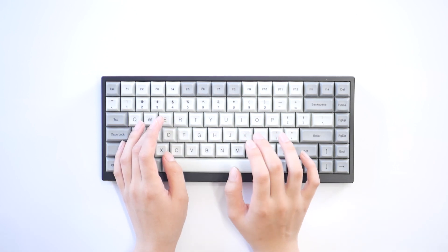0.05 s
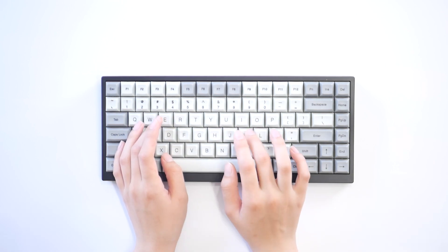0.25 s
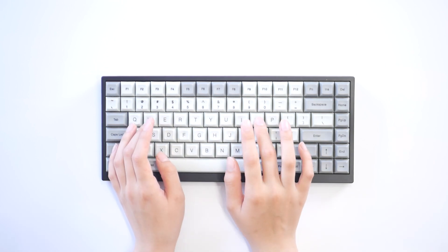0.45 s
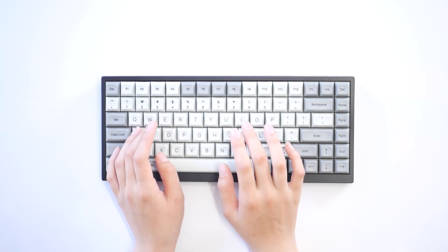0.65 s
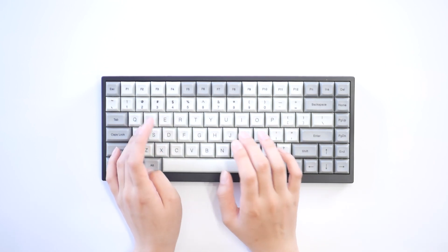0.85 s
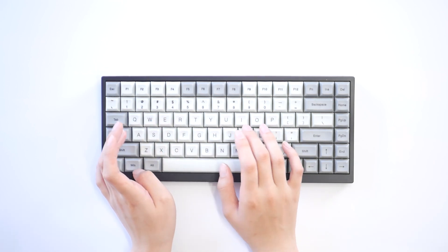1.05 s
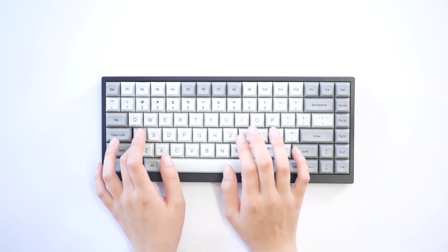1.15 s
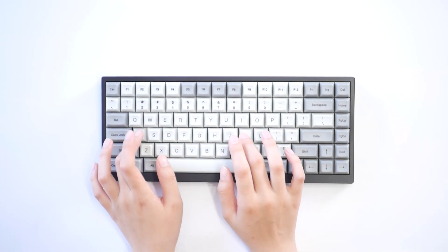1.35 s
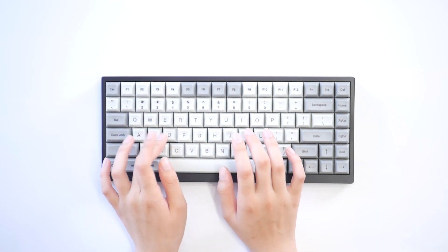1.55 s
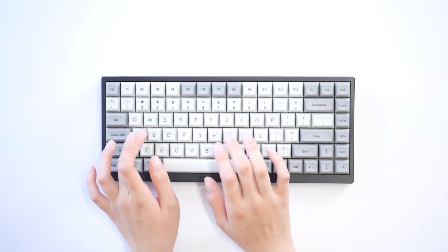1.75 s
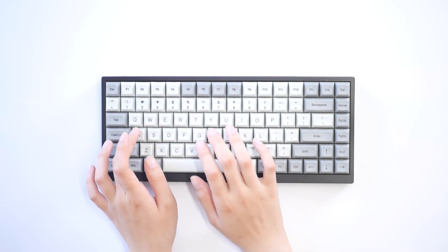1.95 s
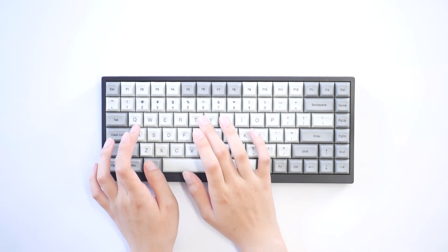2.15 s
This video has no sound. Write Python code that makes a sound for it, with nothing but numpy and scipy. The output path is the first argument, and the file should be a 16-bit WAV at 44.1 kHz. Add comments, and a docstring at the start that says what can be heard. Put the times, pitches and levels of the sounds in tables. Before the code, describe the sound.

Mechanical keyboard typing, crisp light clacks in two quick runs, in a small quiet room

```python
"""A key struck just before the start is dying away; then fingers type on a mechanical keyboard on a desk.
Some stems scrape (filtered noise) before landing; each hit is a clack plus the decaying modes of cap, switch,
plate, case and desk, a crack, a metal ping and a snap; one spring rings on after an early hit.
Dull echoes and a diffuse tail follow each sound in a small quiet room; shaped noise makes a steady low
hum and hiss throughout. Stereo."""
import sys
import numpy as np
from scipy import signal
from scipy.fft import rfft, irfft
from scipy.io import wavfile

SR = 44100
rng = np.random.default_rng(int(sys.argv[2]) if len(sys.argv) > 2 else 0)


def waveform_to_disk(signal):
    """Save audio, clipped to [-1, 1], as 16-bit WAV at the path in sys.argv[1]."""
    frames = np.transpose(np.atleast_2d(signal))
    scaled = np.clip(frames, -1, 1) * 32767
    samples = np.round(scaled).astype(np.int16)
    wavfile.write(sys.argv[1], SR, samples)


N = 97020
LEAD = SR // 5  # samples kept before the start; also the length of every ring


def undb(db):
    """Amplitude factor of a level in dB."""
    return 10 ** (np.asarray(db, float) / 20)


def read(table, hz):
    """Value of a (hz, value) table, interpolated on a log frequency axis."""
    points = np.array(table, float)
    return np.interp(np.log(np.maximum(hz, 1)), np.log(points[:, 0]), points[:, 1])


# Modes of each part: nominal pitch_hz [Hz], relative level_db [dB], t60_s [s]
DESK_MODES = [(60.3, -8.5, 0.071), (84, 0.5, 0.063), (104.6, -6.5, .12), (160.6, -2.7, 0.3)]
CASE_MODES = [(250.4, -2.6, 0.14), (308.5, -4.5, 0.12), (398, -9, 0.12), (523, -7, 0.053)]
PLATE_MODES = [(751, 0.5, 0.029), (958, -6, 0.069), (1119, 5.2, 0.03), (1371, 6.6, 0.032)]
CAP_MODES = [(1560, -3.3, 0.011), (1725, 0.26, 0.046), (2203, 1, 0.045)]
SWITCH_MODES = [(3580, 0.1, 0.021), (3980, 0.1, 0.028)]
CRACK_MODES = [(4610, 8.3, 0.0013), (5700, -2.5, 0.0028), (6840, -3.5, 0.0034), (8460, -7.5, 0.0039)]
PING_MODES = [(9344, 0.1, 0.0057), (10040, -4.5, 0.003)]
SNAP_MODES = [(11180, 0.1, 0.006), (12670, -1, 0.006), (13930, -0.84, 0.0062), (14600, -2, .005)]
PART_MODES = (DESK_MODES, CASE_MODES, PLATE_MODES, CAP_MODES,
              SWITCH_MODES, CRACK_MODES, PING_MODES, SNAP_MODES)
# Per part, in the same order: level added to each hit's part level [dB]
PART_TRIM_DB = (3.5, -4.5, -2.5, -3, -12.5, 1, 2, 12)
# Per part: delay after the clack [s]
PART_LAG_S = (0.0025, 0.0019, 0.001462, 0.00061, .0005, 0.00026, .0005, .0002)
# Per part: onset time constant [s]
PART_RISE_S = (0.002, 0.0012, 0.00066, 0.0015, 0.0008, 0.00019, 0.00015, 0.000053)
CLACK_T60_S, CLACK_RISE_S = .0024, .0005
OVERTONE_RATIO, OVERTONE_DB = 1.283, -1  # clack partials above and below its pitch


def key_strike(pitch_hz, part_levels_db, detune):
    """Impact modes: a three-partial clack of peak 1, and the same clack with all parts ringing after it."""
    partials = [(pitch_hz / OVERTONE_RATIO, OVERTONE_DB, CLACK_T60_S),
                (pitch_hz, 0, CLACK_T60_S),
                (pitch_hz * OVERTONE_RATIO, OVERTONE_DB, CLACK_T60_S)]
    clack = ring(partials, detune, CLACK_RISE_S)
    strike = clack.copy()
    parts = zip(PART_MODES, part_levels_db, PART_TRIM_DB, PART_LAG_S, PART_RISE_S)
    for modes, level_db, trim_db, lag_s, rise_s in parts:
        part_detune = detune * (modes is not PING_MODES)  # the ping keeps its pitch
        part = ring(modes, part_detune, rise_s)
        strike = strike + undb(level_db + trim_db) * late(part, lag_s)
    return clack, strike


# Key hits: start_s [s], clack_peak_db [dB], clack_hz [Hz, nominal],
# desk_db, case_db, plate_db, cap_db, switch_db, crack_db, ping_db, snap_db [dB re clack, before part trim],
# pan_db [dB, left minus right], room_send_db [dB]
KEY_HITS = [(0.2329, -2, 2910, -28, -19, -13, -12, -41, -8, -14.5, -28.5, -2.5, -3.2),
            (0.3439, -9.5, 2790, -30.5, -19.5, -6.5, -11, -9.5, -6.5, -11.5, -30.5, 0.5, -3.4),
            (0.4563, -2, 2440, -26, -19, -15.5, -12, -6, -7, -7.5, -29, 1.5, -3.7),
            (0.544, -10, 2790, -35, -36, -9, -15, -27, -10, -18, -34, 2, -2.8),
            (0.9103, -48.5, 3660, 1.5, 11.5, -12, -4.5, -19, 3.5, -9, -18, -1, 2.2),
            (0.9527, -44.5, 3500, -10, 0.5, -2, -1, -13, -25, -19, -30, -6, 1.5),
            (0.9621, -33, 2930, -35, -27, -5, -27, -27, -19, -21.5, -33, 5, 0.7),
            (1.1691, -17.5, 3390, -30, -20, -25, -12, -23, -10, -11, -25, 3.5, 1.1),
            (1.1814, -10.5, 2670, -34, -15, -14.5, -14.5, -15, -11, -21, -33, 1, -3.5),
            (1.3147, -20.5, 2570, -28, -41, -8.5, -17, -10, -11.5, -15, -35, 1, -0.5),
            (1.3476, -4, 2790, -25.5, -18, -12, -12.5, -34, -8, -13, -32.5, 0.5, -4.4),
            (1.4464, 0.5, 3055, -36.5, -21.5, -17.5, -13, -23, -12, -21.5, -37, 2, -2.06),
            (1.5448, -11, 2480, -31, -13.5, -15, -33, -8, -9, -9.5, -31, 1, -2.5),
            (1.6322, -22, 3050, -32, -4, -4.5, -0.5, -6, -8, -13, -33, -2, -6),
            (1.6549, -11.5, 2700, -30, -13, -12.5, -13, -6, -8.5, -19, -33, 0.5, -2.5),
            (1.7233, -14.5, 2670, -53, -15, -10, -9, -7.5, -8.5, -10.5, -31, 3, -4.3),
            (1.727, -13.5, 2360, -33, -12.5, -8, -17, -5, -31, -28, -41, -3, -0.9),
            (1.8585, -5.5, 2830, -31.5, -21, -25, -11, -29, -13, -13, -33, 1.5, -4.1),
            (1.9119, -15.5, 2324, -26.5, -10.5, -6, -10, -15, -5, -9, -35, 0.0, -4.1),
            (2.0183, -27, 3070, -35, -26, -15.5, -12, -26, -7.5, -14.5, -26, 4, -1.5),
            (2.0456, -31.5, 3300, -17, -10, -15, -14, -10, -20, -18, -31, -4, -2.5)]
# The key struck before the start: the same columns without start_s
EARLIER_HIT = (-16.5, 3192, -20.5, -9, -4, -5.5, -12, -4, -8.5, -25, .1, -1.7)
EARLIER_S = -.07
# rms relative pitch spread; each hit draws five shifts,
# shared by same-numbered modes of the clack and all parts but the ping
DETUNE = 0.041
CONTACT_S = .0007  # from start_s to the sound
UPWARD_SHARE = 0.27  # share of the clack beamed at the microphone, missing the room


def key_hits():
    """Impacts: each hit excites every part, heard straight and, save the beamed clack, through the room."""
    track = np.zeros((2, N + LEAD))
    hits = list(KEY_HITS) + [(EARLIER_S,) + tuple(EARLIER_HIT)]
    detunes = DETUNE * rng.standard_normal((len(hits), 5))
    for hit, detune in zip(hits, detunes):
        start_s, peak_db, pitch_hz, *part_levels_db, pan_db, send_db = hit
        clack, strike = key_strike(pitch_hz, part_levels_db, detune)
        beamed = UPWARD_SHARE * undb(peak_db) * clack
        spread = undb(peak_db) * strike - beamed
        add(track, heard(spread, pan_db, send_db), start_s + CONTACT_S)
        add(track, panned(beamed, pan_db), start_s + CONTACT_S)
    return track[:, LEAD:]


# Stems scraping down their guides before they land: start_s [s], length_s [s], level_db [dB rms before fade-in]
STEM_SLIDES = [(.2248, .009, -29), (.451, .006, -36), (1.168, .003, -38), (1.341, .007, -28),
               (1.439, .008, -36), (1.848, .011, -31)]
SLIDE_HZ, SLIDE_WIDTH_HZ = 2600, 2730
SLIDE_RISE_S, SLIDE_SEND_DB = 0.0016, -1


def stem_slides():
    """Friction: short band-passed noise with a linear fade-in."""
    track = np.zeros((2, N + LEAD))
    edges_hz = [SLIDE_HZ - SLIDE_WIDTH_HZ / 2, SLIDE_HZ + SLIDE_WIDTH_HZ / 2]
    band = signal.butter(1, edges_hz, "band", fs=SR)
    noises = rng.standard_normal((len(STEM_SLIDES), SR // 20))
    for (start_s, length_s, level_db), noise in zip(STEM_SLIDES, noises):
        scrape = signal.lfilter(*band, signal.lfilter(*band, noise))
        scrape = scrape[:int(length_s * SR)]
        fade_in = np.minimum(np.arange(len(scrape)) / SR / SLIDE_RISE_S, 1)
        scrape = undb(level_db) * scrape / scrape.std() * fade_in
        add(track, heard(scrape, 0, SLIDE_SEND_DB), start_s)
    return track[:, LEAD:]


# A spring left ringing: start_s [s], pitch_hz [Hz], peak_db [dB], t60_s [s]
RINGING_SPRINGS = [(.546, 2850, -43, .3)]
SPRING_RISE_S = .0005


def ringing_springs():
    """Free vibration: one decaying sine per spring, cut at the ring length."""
    track = np.zeros((2, N + LEAD))
    for start_s, pitch_hz, peak_db, t60_s in RINGING_SPRINGS:
        tone = ring([(pitch_hz, 0, t60_s)], [0], SPRING_RISE_S)
        add(track, heard(undb(peak_db) * tone, 0, 0), start_s)
    return track[:, LEAD:]


def ring(modes, detune, rise_s):
    """Struck modes: decaying sines of alternating sign with a soft start, peak 1."""
    t = np.arange(LEAD) / SR
    tone = np.zeros(LEAD)
    for k, ((pitch_hz, level_db, t60_s), shift) in enumerate(zip(modes, detune)):
        decay = np.exp(-np.log(1000) * t / t60_s)
        tone += (-1) ** k * undb(level_db) * np.sin(2 * np.pi * pitch_hz * (1 + shift) * t) * decay
    tone *= 1 - np.exp(-(t / rise_s) ** 2)
    return tone / np.abs(tone).max()


def late(sound, delay_s):
    """Sound delayed within its own length."""
    return np.concatenate([np.zeros(int(delay_s * SR)), sound])[:len(sound)]


def add(track, sound, start_s):
    """Mix a sound into a track that begins LEAD samples early."""
    i = int(start_s * SR) + LEAD
    n = min(sound.shape[-1], track.shape[-1] - i)
    track[..., i:i + n] += sound[..., :n]


def panned(sound, pan_db):
    """Stereo by level difference, left minus right."""
    return sound * undb([[pan_db / 2], [-pan_db / 2]])


def heard(sound, pan_db, send_db):
    """Direct sound plus its room response, with a fresh diffuse tail for each sound."""
    out = signal.fftconvolve(room(), undb(send_db) * sound[None], axes=1)
    out[:, :len(sound)] += panned(sound, pan_db)
    return out


# Early echoes: delay_s [s], level_db [dB]
ECHOES = [(.0031, -1.5), (.0092, -5.5), (0.0102, -7), (0.0208, -8)]
# Tail decay: hz [Hz], t60_s [s]
TAIL_T60 = [(100, 0.7), (300, 0.58), (800, 0.34), (2000, .32), (5000, 0.49), (9500, 0.28), (14000, 0.39)]
# Tail colour before the overall tail level: hz [Hz], level_db [dB]
TAIL_COLOUR = [(100, -3.5), (300, -3), (800, 8), (2000, -2), (5000, 1.5), (9500, 4), (14000, -11)]
# Tail side against mid: hz [Hz], level_db [dB]
TAIL_SIDE = [(100, -15), (500, -8.5), (2000, -8.5), (8000, -10), (14000, -2)]
TAIL_DB, TAIL_RISE_S, ECHO_TOP_HZ = 6, .004, 11200


def room():
    """Reflections: a few dull central echoes, then a diffuse noise tail that dies band by band."""
    n = 16384
    t, hz = np.arange(n) / SR, np.fft.rfftfreq(n, 1 / SR)
    centre_hz = 62 * 2 ** np.arange(0, 8.5, .5)[:, None, None]
    noise = rfft(rng.standard_normal((2, n))) * undb([0 * hz, read(TAIL_SIDE, hz)])
    octaves_off = np.clip(np.log2(hz / centre_hz + 1e-9), -.5, .5)
    bands = irfft(noise * np.cos(np.pi * octaves_off) ** 2, n)
    t60_s = read(TAIL_T60, centre_hz)
    decay = undb(read(TAIL_COLOUR, centre_hz) - 60 * t / t60_s)
    decay_norm = np.sqrt(t60_s * SR / np.log(1e6))  # equal energy whatever the t60
    tail = np.sum(bands * decay / decay_norm, axis=0)
    mid, side = tail * (1 - np.exp(-(t / TAIL_RISE_S) ** 2)) * undb(TAIL_DB)
    echoes = np.zeros(n)
    for delay_s, level_db in ECHOES:
        echoes[int(delay_s * SR)] = undb(level_db)
    mid = mid + signal.lfilter(*signal.butter(2, ECHO_TOP_HZ, fs=SR), echoes)
    return np.array([mid + side, mid - side])


# Hum and hiss spectrum before levelling: hz [Hz], density_db [dB per Hz, relative]
HUM_SPECTRUM = [(18, -62), (30, -34), (103, -8.5), (326, -3), (362, -8.5), (392, -5.5), (612, -10.5),
                (861, -13), (1150, -15.5), (1890, -24), (2210, -28), (15800, -41.5)]
# Hum side against mid: hz [Hz], level_db [dB]
HUM_SIDE = [(60, -4), (300, -5), (1000, -2), (8000, -3)]
# A room mode in the hum: pitch_hz [Hz], half_width_hz [Hz], lift_db [dB re the spectrum, added to it]
HUM_MODE = (176.5, 8.5, -1.3)
HUM_MID_RMS_DB = -44


def hum():
    """Low room hum and microphone hiss: steady shaped noise, lifted around one room mode."""
    hz = np.fft.rfftfreq(N, 1 / SR)
    noise = rfft(rng.standard_normal((2, N))) * undb(read(HUM_SPECTRUM, hz))
    mode_hz, half_width_hz, lift_db = HUM_MODE
    noise *= 1 + undb(lift_db) / (1 + ((hz - mode_hz) / half_width_hz) ** 2)
    mid = irfft(noise[0], N)
    side = irfft(noise[1] * undb(read(HUM_SIDE, hz)), N)
    return np.array([mid + side, mid - side]) * undb(HUM_MID_RMS_DB) / mid.std()


def scene():
    """Typing over the room hum."""
    return key_hits() + stem_slides() + ringing_springs() + hum()


MIC_LOW_HZ, TOP_HZ = 29.6, 15700


def record(dry):
    """The microphone loses the deepest bass; the recorder cuts the top steeply."""
    mic = signal.lfilter(*signal.butter(1, MIC_LOW_HZ, "high", fs=SR), dry)
    return signal.sosfilt(signal.ellip(10, .2, 70, TOP_HZ, fs=SR, output="sos"), mic)


dry = scene()
out = record(dry)
waveform_to_disk(out)
```